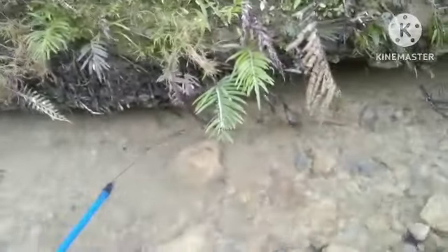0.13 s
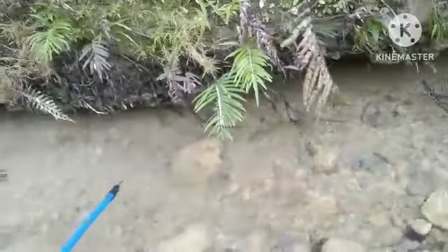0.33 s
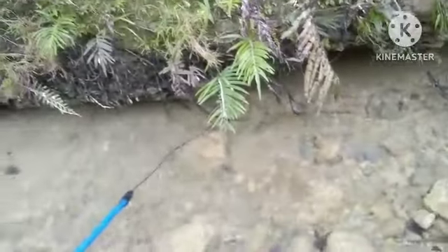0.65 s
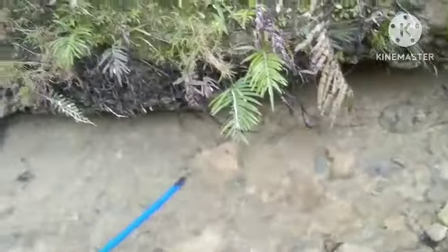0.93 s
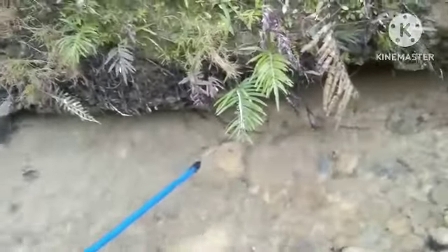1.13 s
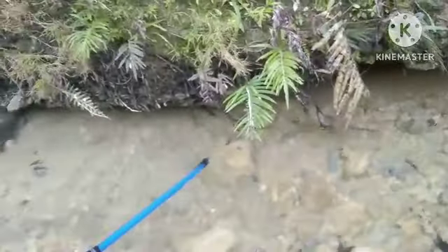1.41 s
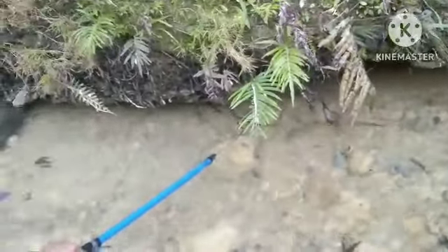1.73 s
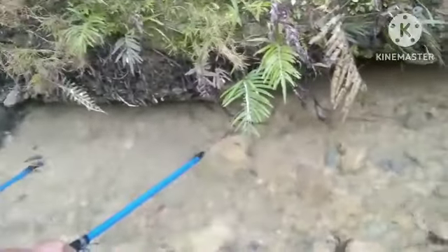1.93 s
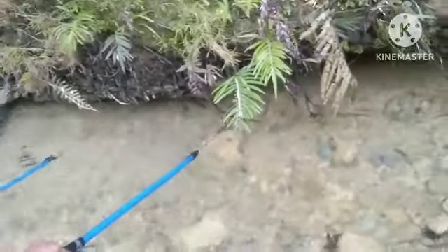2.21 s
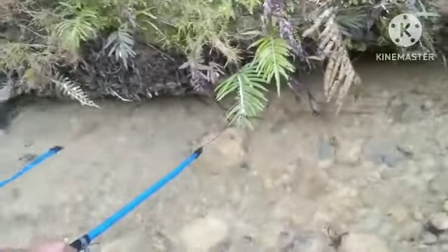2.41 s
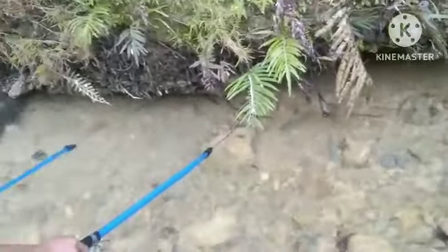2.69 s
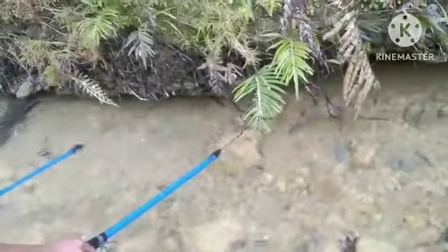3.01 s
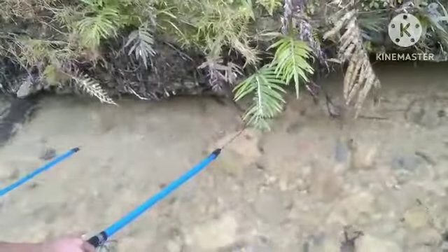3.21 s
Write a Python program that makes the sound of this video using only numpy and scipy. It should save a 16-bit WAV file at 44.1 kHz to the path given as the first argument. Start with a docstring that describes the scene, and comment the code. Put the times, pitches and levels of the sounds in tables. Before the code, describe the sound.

Close outdoor sound of water disturbed in a shallow stream: small drips, a busy burst of slaps and bloops, a quieter gap with cricket chirps and a brief hiss, then heavy plops and two more hisses.

```python
"""A shallow stony stream, close to someone wading: sloshing water is dense random bubbles ringing in four
ranges; plops, drips and bloops are gliding sines, slaps are clicks with dying noise, and three short
hisses close by are coloured noise. On the bank two crickets throb (pulsed narrow noise) with a rasping
insect, a thin whine and one faint arched whistle; steady coloured noise is the far chorus and the flow."""
import sys
import numpy as np
from scipy import signal
from scipy.fft import rfft, irfft
from scipy.io import wavfile

SR = 44100
rng = np.random.default_rng(int(sys.argv[2]) if len(sys.argv) > 2 else 0)


def generate_wav(sig):
    """Save sig (samples, or channels by samples) to the path in sys.argv[1] as 16-bit PCM at SR."""
    pcm = np.round(np.clip(np.atleast_2d(sig).T, -1, 1) * 32767).astype(np.int16)
    wavfile.write(sys.argv[1], SR, pcm)


N = 147735

# bubble ranges, from gurgle through splash and spray to fine mist:
# (lowest [Hz], highest [Hz], bubbles [per s], ring to -35 dB [cycles], size spread [dB])
BUBBLE_RANGES = [(430, 892, 350, 35, 4), (1000, 2800, 720, 45, 2.5), (3175, 5900, 2500, 71, 4.5),
                 (8420, 14000, 8200, 150, 5.5)]


def amp(db):
    """Level in dB to amplitude."""
    return 10 ** (np.asarray(db) / 20)


def rms_one(x):
    """Scale to rms 1."""
    return x / np.sqrt(np.mean(x ** 2) + 1e-20)


def in_time(rows):
    """Draw straight lines through (time [s], values...) rows; one curve per value column."""
    s, *columns = np.transpose(rows)
    return [np.interp(np.arange(N) / SR, s, column) for column in columns]


def coloured(points):
    """Noise with the spectrum given by (frequency [Hz], level [dB per Hz]) points; rms 1."""
    hz, db = np.transpose(points)
    log_hz = np.log(np.fft.rfftfreq(N, 1 / SR) + 1)
    shape = amp(np.interp(log_hz, np.log(hz), db))
    return rms_one(irfft(rfft(rng.standard_normal(N)) * shape, N))


def drift(rate_hz):
    """Slow chance wandering, spread 1: noise through two equal low-pass poles at rate_hz."""
    step = 40  # samples between drawn points
    r = np.exp(-2 * np.pi * rate_hz * step / SR)
    noise = rng.standard_normal(N // step + 2002)
    slow = signal.lfilter([1], [1, -2 * r, r * r], noise)[2000:]  # the filter has settled
    return np.interp(np.arange(N) / step, np.arange(len(slow)), rms_one(slow))


def resonate(x, hz, width_hz):
    """One two-pole resonance, ringing longer the narrower it is."""
    r = np.exp(-np.pi * width_hz / SR)
    return signal.lfilter([1 - r, 0, r - 1], [1, -2 * r * np.cos(2 * np.pi * hz / SR), r * r], x + 1e-18)


def band(x, low_hz, high_hz):
    """Keep one range of frequencies."""
    return signal.sosfilt(signal.butter(4, [low_hz, high_hz], "band", fs=SR, output="sos"), x)


def add(out, s, x):
    """Mix x into out from time s [s]."""
    i = int(s * SR)
    out[i:i + len(x)] += x[:N - i]


def froth():
    """Dense random bubbles ring in four ranges; each of 12 pitches comes in streaks. Each range has rms 1."""
    streak_db, tilt_power = 8.5, 0.79  # the tilt favours the large, low bubbles of each range
    layers = []
    for low_hz, high_hz, per_s, cycles, spread_db in BUBBLE_RANGES:
        strengths = amp(spread_db * np.minimum(rng.exponential(1, N), 4)) * rng.choice([-1, 1], N)
        born = rng.random(N) < per_s / SR
        dealt = rng.integers(0, 12, N)  # which pitch each bubble gets
        rings = np.zeros(N)
        for k, hz in enumerate(np.geomspace(low_hz, high_hz, 12)):
            ring = resonate(strengths * born * (dealt == k), hz, 1.28 * hz / cycles)
            rings += ring * amp(streak_db * np.tanh(drift(4.1))) / hz ** tilt_power
        layers.append(rms_one(band(rings, 0.98 * low_hz, 1.032 * high_hz)))
    return np.array(layers)


def slosh(bubbles):
    """Slosh round the legs: each bubble range swells on its own curve; all clump together."""
    # three stretches of levels: (time [s], gurgle [dB], splash [dB], spray [dB], fine mist [dB])
    swells = [
        [(0.0, -70.5, -58.5, -58, -79), (0.142, -59, -72.5, -58, -77), (0.28, -67.5, -70.5, -64.5, -85),
         (0.504, -67.5, -68.5, -70, -83), (0.64, -63.5, -67.5, -70, -75), (0.802, -64, -70.5, -74, -83),
         (0.902, -99, -68.5, -68, -88), (1.028, -74, -59.5, -75, -73), (1.152, -70, -54, -72, -73),
         (1.2, -47.5, -56, -90.5, -78)],
        [(1.24, -36.5, -50, -73, -77), (1.328, -50.5, -45.5, -70, -83), (1.456, -47.5, -39.5, -45.5, -63),
         (1.562, -62, -47.5, -47, -77), (1.658, -48.5, -35.5, -49, -63), (1.746, -51, -42, -41.5, -57.5),
         (1.836, -39, -36.5, -34.5, -57), (1.952, -54.5, -63, -46.5, -69), (2.102, -77, -74, -89, -78),
         (2.232, -70, -72, -73, -78), (2.34, -51, -58, -69, -81)],
        [(2.56, -51.5, -72, -69, -75), (2.626, -52.5, -52, -64, -78), (2.714, -70.5, -64.5, -73, -78),
         (2.866, -76, -65.5, -75, -82), (2.942, -25, -42.5, -54, -64), (2.97, -39, -41, -45.5, -64)],
    ]
    clump = amp(1.5 * drift(21.4))
    return clump * np.sum(amp(in_time(np.vstack(swells))) * bubbles, axis=0)


def slaps(bubbles):
    """Sheets of water break: a click (none for deep thuds), then bubbly, fluttering noise that dies away."""
    # slaps and spatters: (time [s], level [dB], lowest [Hz], highest [Hz], fall by 60 dB [s])
    slap_rows = [(0.087, -45, 3520, 3930, 0.4), (.565, -50, 3610, 4410, 0.44),
                 (.575, -50.5, 2200, 2650, 0.37), (.607, -59, 8450, 15000, 0.072),
                 (.885, -53, 61, 253, 0.59), (.995, -49, 3580, 4900, 1.1),
                 (1.048, -59.5, 8500, 15500, 0.21), (1.185, -48, 3580, 4700, 0.64),
                 (1.228, -39.5, 1500, 1990, 0.49), (1.276, -55.5, 60, 202, 0.6),
                 (1.325, -40.5, 1750, 2240, 1.5), (1.338, -37.5, 3260, 4630, 0.31),
                 (1.366, -33, 1000, 2450, 0.67), (1.37, -33.5, 2760, 4670, 0.55),
                 (1.398, -31, 1440, 2510, 0.27), (1.47, -53, 7950, 10100, 0.41),
                 (1.503, -34.5, 3040, 5120, 0.41), (1.505, -35, 610, 2170, 0.32),
                 (1.568, -27.5, 774, 2200, 0.34), (1.572, -42, 3450, 5150, 0.42),
                 (1.629, -46, 1000, 2880, 1.03), (1.648, -38.5, 3500, 5200, 0.66),
                 (1.72, -42.5, 303, 1360, 0.43), (1.722, -33.5, 3180, 5460, 0.26),
                 (1.746, -53, 3500,  14800, 0.2), (1.806, -37, 1000, 2470, 0.44),
                 (1.823, -30.5, 3100, 6460, 0.14), (1.825, -48, 8500, 10200, 0.36),
                 (1.839, -26, 3240, 5900, 0.07), (1.853, -36, 3270, 6300, 0.46),
                 (1.901, -34, 3130, 5800, 0.075), (1.957, -35.5, 1980, 2740, 0.23),
                 (1.965, -46.5, 9200, 14900, 0.21), (2.105, -49, 3860, 4700, 0.4),
                 (2.25, -57, 430, 606, 1.1), (2.288, -49.5, 1690, 2020, 1.4), (2.31, -54, 405, 625, 1),
                 (2.465, -46.5, 398, 670, 0.92), (2.325, -52.5, 3700, 5360, 0.75),
                 (2.757, -52, 3590, 4700, 1), (2.775, -48.5, 2700, 2950, 0.15),
                 (2.865, -53, 4560, 4830, 0.81), (2.895, -38, 910, 2100, 0.44),
                 (2.918, -46.5, 143, 348, 0.58), (2.926, -27.5, 650, 1420, 0.19),
                 (2.978, -39.5, 6260, 6890, 0.5), (2.978, -42, 6960, 10800, 0.11),
                 (3.166, -44.5, 7560, 8950, 0.39)]
    click_db, flutter_db = 4.5, 1.5  # click over the noise level; spread of the flutter
    out, t = np.zeros(N), np.arange(SR // 2) / SR
    # bubbles as strong as the white noise within each range
    share = np.sqrt([[2 * (high_hz - low_hz) / SR] for low_hz, high_hz, *_ in BUBBLE_RANGES])
    spray = rng.standard_normal(N) + np.sum(share * bubbles, axis=0)
    for s, db, low_hz, high_hz, t60 in slap_rows:
        stretch = np.roll(spray, -rng.integers(N))[:2 * len(t)]
        noise = rms_one(band(stretch, low_hz, high_hz)[len(t):])
        slap = noise * (1 - np.exp(-t * high_hz / 2)) * amp(db - 60 * t / t60)
        if low_hz > 400:
            click = band((t == 0) + 1e-18, low_hz, high_hz)
            slap = slap + click / click.max() * amp(db + click_db)
        add(out, s, slap)
    return out * amp(flutter_db * drift(34))


def plops():
    """A bubble rings briefly, rising in pitch; a ragged narrow wake dies away after it."""
    # single plops and drips: (time [s], pitch [Hz], level [dB], wake's fall by 60 dB [s])
    plop_rows = [(0.016, 917, -50.5, 0.21), (0.018, 2470, -47, 0.13), (0.145, 4740, -46.5, 0.22),
                 (0.203, 465, -39, 0.22), (0.215, 706, -41.5, 0.18), (0.215, 1090, -44.5, 0.24),
                 (0.301, 3160, -49, 0.083), (0.358, 430, -48, 0.18), (0.612, 3830, -42, 0.089),
                 (0.637, 1984, -48.5, 0.12), (0.65, 935, -55.5, 0.13), (0.693, 665, -46, 0.32),
                 (0.783, 2110, -48, 0.096), (0.885, 170, -48, 0.99), (0.964, 1192, -36.5, 0.21),
                 (0.978, 560, -37.5, 0.37), (0.993, 4690, -53, 0.44), (1.048, 4560, -39.5, 0.15),
                 (1.055, 2010, -47, 0.33), (1.069, 854, -38.5, 0.19), (1.149, 1240, -32.5, 0.53),
                 (1.186, 4134, -39, 0.61), (1.249, 676, -26.5, 0.17), (1.284, 620, -24.5, 0.039),
                 (1.339, 4110, -26, 0.062), (1.406, 1624, -29, 0.12), (1.509, 866, -22, 0.14),
                 (1.567, 1340, -40, 0.13), (1.653, 2190, -29, 0.13), (1.662, 3950, -26.5, 0.11),
                 (1.72, 656, -28, 0.11), (1.759, 679, -22, 0.069), (1.84, 526, -22.5, 0.051),
                 (1.847, 2010, -33, 0.21), (1.898, 1825, -29, 0.15), (1.957, 2024, -30.5, 0.082),
                 (1.964, 3890, -21.5, 0.023), (2.105, 2035, -43, 0.34), (2.114, 4100, -37, 0.088),
                 (2.148, 2715, -44.5, 0.16), (2.204, 1234, -55.5, 0.57), (2.257, 166, -42.5, 0.29),
                 (2.602, 1200, -44.5, 0.11), (2.603, 2053, -39, 0.2), (2.757, 3895, -37, 0.058),
                 (2.76, 910, -39, 0.12), (2.805, 2010, -43.5, 0.14), (2.887, 1310, -35.5, 0.55),
                 (2.925, 1420, -24.5, 0.11), (2.948, 544, -22.5, 0.12), (2.981, 509, -23, 0.15),
                 (3.065, 643, -23, 0.093), (3.126, 670, -25, 0.026), (3.167, 1630, -20.5, 0.1),
                 (3.3, 1040, -31, 0.068), (3.343, 4240, -26, 0.05)]
    ring_cycles, rise = 9.6, 0.042  # cycles to fall 60 dB; share the pitch rises over them
    wake_db, wake_share, narrowing = -4.5, 0.065, 0.53  # share of pitch at 1 kHz, less above by this power
    out, t = np.zeros(N), np.arange(SR // 2) / SR
    for s, hz, db, t60 in plop_rows:
        turns = hz * t
        phase = 2 * np.pi * turns * (1 + rise * turns / ring_cycles / 2)
        bubble = np.sin(phase) * amp(-60 * turns / ring_cycles)
        edge = 1 + wake_share * (hz / 1000) ** -narrowing
        wake = rms_one(band(rng.standard_normal(2 * len(t)), hz / edge, hz * edge)[len(t):])
        attack = (1 - np.exp(-turns)) ** 2  # about one cycle
        add(out, s, amp(db) * attack * (2 * bubble + wake * amp(wake_db - 60 * t / t60)))
    return out


def bloops():
    """Each is one sine gliding under a quick fluttering swell, which peaks later for upward glides."""
    # (time [s], first pitch [Hz], last pitch [Hz], length [s], level [dB])
    bloop_rows = [(0.0845, 3670, 3670, .006, -33), (1.183, 438, 480, 0.013, -30),
                  (1.229, 880, 884, 0.023, -28), (1.246, 1106, 2170, 0.018, -28),
                  (1.28, 220, 215, .06, -36.5), (1.378, 1205, 1250, 0.027, -29),
                  (2.285, 674, 814, 0.038, -35.5), (2.288, 468, 460, 0.038, -39),
                  (2.921, 570, 570, 0.007, -21.5), (2.927, 825, 800, 0.0046, -17),
                  (2.9335, 760, 720, 0.014, -19), (2.9334, 492, 539, 0.02, -14.5),
                  (2.981, 1410, 1330, 0.017, -24.5)]
    out, flutter = np.zeros(N), drift(115)
    for s, from_hz, to_hz, length, db in bloop_rows:
        u = np.linspace(0, 1, int(length * SR))
        swell = np.sin(np.pi * u ** (0.47 * to_hz / from_hz)) ** 1.1
        swell = swell * amp(2.52 * flutter[int(s * SR):][:len(u)])
        hz = from_hz + (to_hz - from_hz) * u ** 0.77
        add(out, s, amp(db) * swell * np.sin(2 * np.pi * np.cumsum(hz) / SR))
    return out


def hisses():
    """Sudden, flat, fluttering hiss with narrow resonances; it drops sharply, then trails off."""
    # close hisses: (time [s], length [s], level [dB])
    bursts = [(2.361, 0.15, -30.5), (3.003, 0.11, -29), (3.161, 0.12, -30)]
    # colour of the hiss: (frequency [Hz], level [dB per Hz])
    hiss_colour = [(180, -52), (300, -34), (366, -41), (642, -10.5), (745, -20), (1070, -9), (1260, 3),
                   (1440, -28), (1570, 9), (1700, -1), (2150, 6), (3140, -2.5), (3410, 7), (4160, -4.5),
                   (5700, -2), (7550, -40), (8340, -35), (9520, -0.5), (10700, -67), (11800, -20.5),
                   (15600, -30)]
    # resonances in the hiss: (frequency [Hz], width of each of two passes [Hz], level [dB])
    resonances = [(1287, 41, 1.5), (1580, 39, -17), (2130, 52, 1), (2360, 45, -18), (2700, 70, -25),
                  (2950, 62, 9), (3436, 69, 9.5), (4530, 53, -18), (4950, 77, 6), (5610, 25, -1)]
    resonances_db, attack_s = -6.5, 0.002
    drop_db, drop_s = -5, 0.0054
    tail_db_per_s, tail_db_per_s2 = -170, -900  # the tail falls ever faster
    t, env, white = np.arange(N) / SR, np.zeros(N), rng.standard_normal(N)
    for s, length, db in bursts:
        after = np.maximum(t - s - length, 0)
        fall_db = drop_db * np.minimum(after / drop_s, 1)
        fall_db = fall_db + tail_db_per_s * after + tail_db_per_s2 * after ** 2
        env += np.clip((t - s) / attack_s, 0, 1) * amp(db + fall_db)
    ringing = np.zeros(N)
    for hz, width_hz, db in resonances:
        ring = resonate(resonate(white, hz, width_hz), hz, width_hz)
        ringing += amp(db + 4.9 * drift(12)) * ring
    flutter = amp(0.83 * drift(47))
    return env * flutter * (coloured(hiss_colour) + amp(resonances_db) * rms_one(ringing))


def tone(hz, width_hz):
    """A wavering insect tone: noise through the same resonance twice; rms 1."""
    return rms_one(resonate(resonate(rng.standard_normal(N), hz, width_hz), hz, width_hz))


def bank_echo(env):
    """The bank answers each chirp: its envelope smeared into an exponential tail."""
    fade = np.exp(-1 / (0.046 * SR))  # 46 ms
    return amp(-3) * signal.lfilter([1 - fade], [1, -fade], env)


def near_cricket():
    """A cricket on the bank chirps in four pulses on two close tones."""
    # (time [s], level [dB])
    near_chirps = [(0.035, -43.5), (0.1056, -47), (0.199, -41.5), (0.2753, -40), (0.352, -39), (0.429, -42),
                   (0.5054, -47), (0.586, -43.5), (0.657, -45.5), (0.736, -44), (0.827, -46.5),
                   (0.892, -46.5), (0.9722, -49), (1.05, -46.5), (1.3187, -43), (1.3947, -43.5),
                   (1.4681, -42), (1.5494, -55), (2.087, -42.5), (2.23, -45), (2.74, -43.5), (2.815, -44.5),
                   (2.8712, -50), (2.9194, -53)]
    hz, side_hz, side_db, pulse_step_s = 5852, 5550, -6, 0.012
    env = np.zeros(N)
    pulse = np.hanning(int(1.29 * pulse_step_s * SR))  # pulses overlap
    for s, db in near_chirps:
        for k, share in enumerate([0.8, 0.96, 0.6, 0.1]):
            add(env, s - 0.004 + k * pulse_step_s, amp(db) * share * pulse)
    direct = tone(hz, 30.5) + amp(side_db) * tone(side_hz, 60)
    return 0.54 * env * direct + bank_echo(env) * tone(hz - 60, 133)


def high_cricket():
    """A second, higher cricket gives single smooth chirps."""
    # (time [s], level [dB])
    high_chirps = [(1.2747, -48), (1.4677, -46), (1.6967, -41), (1.7551, -44), (1.8234, -48),
                   (1.953, -36.5), (2.0532, -41), (2.124, -40), (2.201, -41), (2.29, -38.5),
                   (2.3856, -33.5), (2.4814, -37), (2.579, -34)]
    hz, length_s = 6453, 0.027
    env = np.zeros(N)
    for s, db in high_chirps:
        add(env, s - 0.005, amp(db) * np.hanning(int(length_s * SR)))
    return 0.5 * env * tone(hz, 28) + bank_echo(env) * tone(hz, 69)


def rasping_insect():
    """A narrow band of noise swells and flutters."""
    # (time [s], level [dB])
    rasp_swells = [(0.0, -50), (0.08, -74), (0.26, -96), (0.57, -56.5), (0.69, -82), (0.88, -58.5),
                   (1.03, -58.5), (1.28, -71), (1.4, -57), (1.55, -50), (1.8, -44.5), (2.1, -65.5),
                   (2.19, -75), (2.39, -83), (2.51, -62), (2.79, -65.5), (3.0, -46.5)]
    level_db, = in_time(rasp_swells)
    return amp(level_db + 3.7 * drift(42)) * tone(3913, 120)


def insect_whine():
    """A thin, high, slowly wavering insect tone fades out at 1.6 s."""
    fade_out = np.clip((1.6 - np.arange(N) / SR) / 0.23, 0, 1)
    return amp(-83 + 3.6 * drift(1.5)) * fade_out * tone(14000, 90)


def arched_whistle():
    """A faint, rough, thin whistle: one sine whose jittery pitch arches up and down."""
    # (end pitch [Hz], top pitch [Hz], level [dB])
    end_hz, top_hz, db = (13400, 14200, -63)
    start_s, length_s, jitter_hz = 2.055, 0.13, 120
    out, u = np.zeros(N), np.linspace(0, 1, int(length_s * SR))
    hz = end_hz + (top_hz - end_hz) * np.sin(np.pi * u) + jitter_hz * drift(200)[:len(u)]
    swell = np.sqrt(np.abs(np.sin(np.pi * u)))
    add(out, start_s, amp(db) * swell * np.sin(2 * np.pi * np.cumsum(hz) / SR))
    return out


def murmur_and_chorus():
    """The flow's murmur and the far insect chorus merge into steady coloured noise."""
    # (frequency [Hz], level [dB per Hz])
    floor_colour = [(25, -25), (48, 2), (210, -9.5), (330, -9), (510, 5), (830, -23), (1200, -16),
                    (2150, -7.5), (3000, -3.5), (3870, -28), (5000, -17), (6170, -15), (6700, 1.5),
                    (7320, 7), (8100, -0.5), (9350, -21), (12500, -25), (13800, -20), (15600, -29)]
    return amp(-61.5) * coloured(floor_colour)


def scene():
    """Water round the legs, then the hisses, the insects on the bank and the far background."""
    bubbles = froth()
    water = slosh(bubbles) + slaps(bubbles) + plops() + bloops()
    insects = near_cricket() + high_cricket() + rasping_insect() + insect_whine()
    return (water + hisses() + insects + arched_whistle() + murmur_and_chorus())[None]


def record(dry):
    """The microphone channel: bass is cut below 45 Hz and the top is gone from 15850 Hz up."""
    dry = signal.sosfilt(signal.butter(2, 45, "high", fs=SR, output="sos"), dry)
    return signal.sosfilt(signal.cheby2(14, 60, 15850, fs=SR, output="sos"), dry)


dry = scene()
out = record(dry)
generate_wav(out)
```